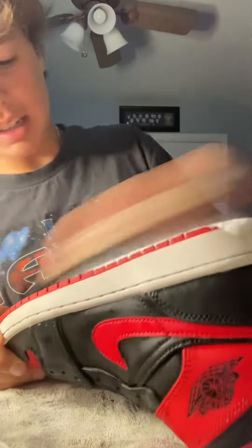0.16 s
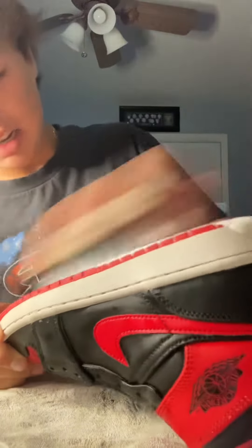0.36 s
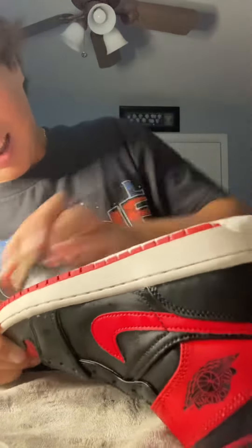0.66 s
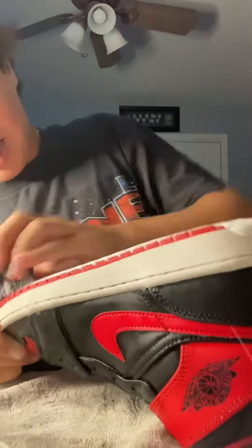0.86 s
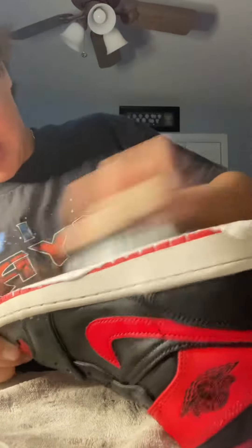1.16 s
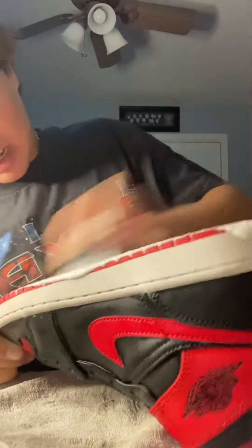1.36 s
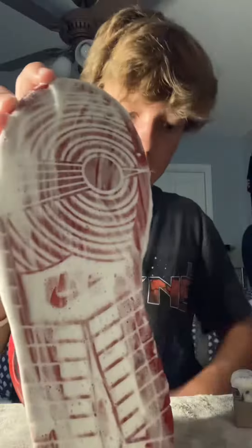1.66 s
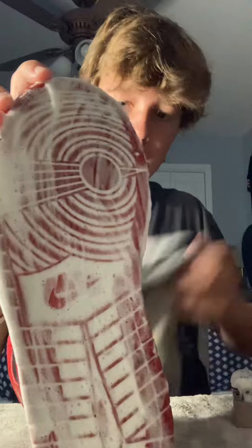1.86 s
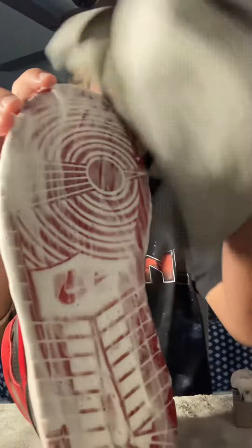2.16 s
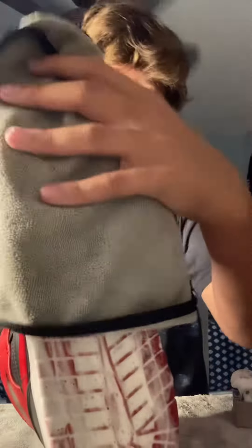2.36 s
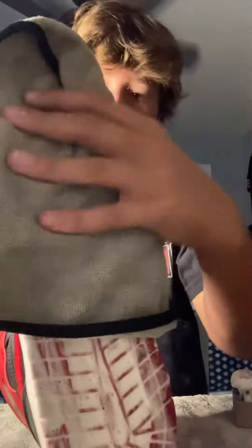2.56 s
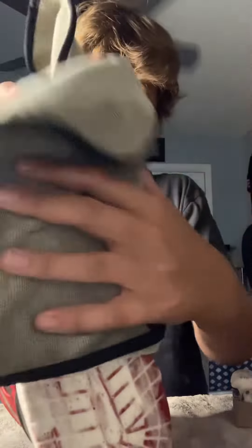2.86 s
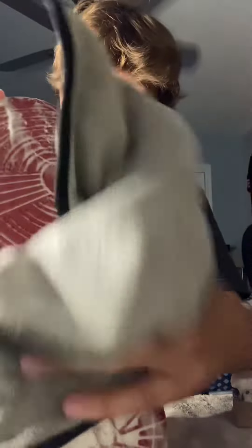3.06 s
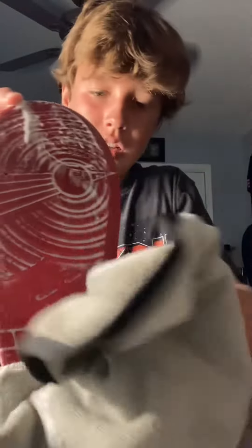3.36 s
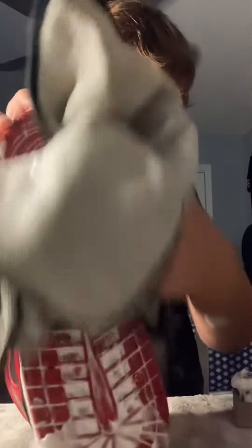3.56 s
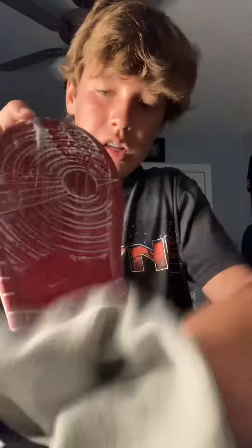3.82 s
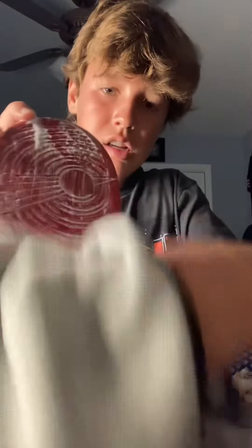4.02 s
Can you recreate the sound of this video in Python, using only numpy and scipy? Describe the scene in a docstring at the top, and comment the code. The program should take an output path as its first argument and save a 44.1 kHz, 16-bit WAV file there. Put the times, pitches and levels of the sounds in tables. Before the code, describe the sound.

Rapid scratchy back-and-forth brushing on a sneaker sole cuts off, leaving a quiet room with faint cloth rustle, soft thuds and muffled wiping.

```python
"""A stiff brush scrubs a sneaker's ridged rubber sole in fast strokes, close to a phone, and breaks off.
Then a cloth is shaken out, patted on the sole and wiped over it in a quiet bedroom.
Brush and cloth: clumped noise of tiny slips, shaped by spectra and resonances, under motion envelopes.
Judder: wavering tones; pats: damped sines with noise taps; room: shaped noise and a narrow whir.
"""
import sys
import numpy as np
from scipy import signal
from scipy.fft import rfft, irfft, next_fast_len
from scipy.io import wavfile
from scipy.ndimage import uniform_filter1d, map_coordinates

SR = 44100
rng = np.random.default_rng(int(sys.argv[2]) if len(sys.argv) > 2 else 0)


def file_out(sig):
    """Save sig as 16-bit WAV at sys.argv[1]."""
    # one column per channel
    cols = np.atleast_2d(sig).T
    # limit, then scale
    lim = np.clip(cols, -1, 1)
    pcm = np.round(lim * 32767).astype(np.int16)
    wavfile.write(sys.argv[1], SR, pcm)


N = 184690  # samples


def amp(db):
    """Decibels to gain."""
    return 10 ** (np.asarray(db) / 20)


def unit(x):
    """Scale to rms 1."""
    return x / np.sqrt(np.mean(x ** 2) + 1e-20)


def along(points, hz):
    """Gain interpolated through (f/Hz, level/dB) points on a log-frequency axis."""
    f, db = np.transpose(points)
    return amp(np.interp(np.log(hz + 1), np.log(f + 1), db, left=-120))


def modes(table, f):
    """Causal response of parallel resonances with alternating sign."""
    total = 0
    for k, (center_hz, width_hz, db) in enumerate(table):
        damping = 1j * f * width_hz
        total = total + (-1) ** k * amp(db) * damping / (center_hz ** 2 - f * f + damping)
    return total


def filtered(x, response):
    """Apply a complex frequency response, zero-padded."""
    m = next_fast_len(N + SR // 2)
    return irfft(rfft(x, m) * response(np.fft.rfftfreq(m, 1 / SR)), m)[..., :N]


def wobble(knots_per_s):
    """Smooth random curve through spline knots."""
    knots = rng.standard_normal(int(N / SR * 400) + 4)
    return map_coordinates(knots, [np.arange(N) * min(knots_per_s, 400) / SR])


def grit(spiky_db, clump_db, knots_per_s):
    """Two rows of dense tiny slips: a few far stronger, the strength clumped in time."""
    sizes = amp(spiky_db * rng.exponential(size=N) + clump_db * wobble(knots_per_s))
    return unit(sizes * rng.standard_normal((2, N)))


def patchy(x, depth_db):
    """Colour shifts: smoothed random gain patches in time and frequency."""
    z = signal.stft(x, nperseg=256)[2]
    field = uniform_filter1d(rng.standard_normal(z.shape[1:]), size=4, axis=0)
    field = uniform_filter1d(field, size=10, axis=1)
    return unit(signal.istft(z * amp(depth_db * unit(field)), nperseg=256)[1][:, :N])


def arch(start_s, length_s, lean):
    """Motion swelling 0-1-0; lean < 1 peaks early, > 1 late."""
    done = np.clip((np.arange(N) / SR - start_s) / length_s, 0, 1)
    return np.abs(np.sin(np.pi * done ** np.clip(lean, .3, 3)))


def walls(x, t60_s, wet_db):
    """Add a furnished room's short answer: exponentially decaying noise."""
    t = np.arange(SR // 4) / SR
    tail = rng.standard_normal((2, len(t))) * amp(-60 * t / t60_s)
    return x + amp(wet_db) * signal.fftconvolve(x, tail / np.linalg.norm(tail[0]), axes=1)[:, :N]


# channel relation above the pair tables, lead growing evenly: (in-phase f/Hz, f per full turn/Hz, likeness 0-1)
TREBLE_LEAD = (8775, 5080, 1)


def ports(rows, table):
    """Two phone channels from a direct and an unrelated row, with frequency-dependent phase lead."""
    f, lead, alike = np.transpose(table)
    zero_hz, turn_hz, treble = TREBLE_LEAD
    # whole number of turns at zero_hz: channels in phase there
    level = 2 * np.pi * np.round(lead[-1] / (2 * np.pi) + (zero_hz - f[-1]) / turn_hz)
    top = level + 2 * np.pi * (SR / 2 - zero_hz) / turn_hz

    def response(hz, row):
        phase = np.interp(hz, [*f, zero_hz, SR / 2], [*lead, level, top])
        likeness = np.clip(np.interp(hz, [*f, zero_hz], [*alike, treble]), 0, 1)
        u = np.arccos(likeness) / 2
        mix = [[np.cos(u), np.cos(u)], [np.sin(u), -np.sin(u)]][row]
        return mix * np.exp(.5j * phase * [[1], [-1]])

    direct = filtered(rows[0], lambda hz: response(hz, 0))
    unrelated = filtered(rows[1], lambda hz: response(hz, 1))
    return direct + unrelated


# brush strokes, each to the next turn: (turn t/s, bristle level/dB, tread level/dB, hollow-shoe level/dB, lean)
BRUSH_STROKES = [(-.05, -29, -29, -36, 0.72), (0.071, -22, -22.5, -32.5, 0.62), (.174, -23.5, -21, -28, 1),
                 (0.281, -24, -24, -29, 1.05), (.4, -22.5, -20.5, -29, 0.98), (0.519, -22, -20, -28, 0.97),
                 (0.611, -22, -24, -32, 1.045), (0.728, -21.5, -24, -35.5, 0.92),
                 (0.833, -22.5, -22, -31.5, 0.87), (0.954, -21.5, -19.5, -30.5, 0.86),
                 (1.063, -25, -20.5, -29, .99), (1.166, -24, -20.5, -29.5, 1.09),
                 (1.269, -30, -25, -30.5, 1.02), (1.393, -28, -27, -30.5, 0.79),
                 (1.499, -30.5, -28.5, -28.5, 0.9)]
OVERLAP_S, LAST_STROKE_S = 0.011, 0.11  # bristles trail past the turn; length of the stroke that breaks off
PUSH_LATER = 1.2  # lean factor: weight peaks later than speed


def stroke_levels():
    """Bristle, tread and push envelopes: louder the faster, or heavier, the stroke."""
    tips, ridges, push = np.zeros((3, N))
    lengths = np.append(np.diff([row[0] for row in BRUSH_STROKES]), LAST_STROKE_S) + OVERLAP_S
    for (start, tips_db, tread_db, hollow_db, lean), length in zip(BRUSH_STROKES, lengths):
        speed = np.tanh(1.215 * arch(start, length, lean) ** 1.8)  # quick turn, even sweep
        tips += amp(tips_db) * speed ** 1.21
        ridges += amp(tread_db) * speed
        push += amp(hollow_db) * arch(start, length, PUSH_LATER * lean) ** 1.1
    return tips, ridges, push


# bristle slip spectrum: (f/Hz, relative level/dB per Hz)
BRISTLE_SPECTRUM = [(500, -36.5), (1200, -28), (3000, -8), (5000, -4.5), (6400, -12.5), (8000, -11.5),
                    (12000, -13.5), (15500, -19)]


def bristles(level):
    """Bristle tips slip over the tread: hiss."""
    hiss = filtered(grit(1.9, 1.6, 85), lambda hz: along(BRISTLE_SPECTRUM, hz))
    return level * patchy(hiss, depth_db=3.0)


# tread resonances: (f/Hz, width/Hz, relative level/dB)
TREAD_MODES = [(833, 170, 5.5), (1462, 160, 9), (1770, 400, 5), (2803, 790, 14.5), (3138, 954, 11.5),
               (5240, 4700, -8)]


def tread(level):
    """Slips ring the rubber ridges; resonances trade strength at random, about as fast as the strokes."""
    slips = grit(2.38, 1.1, 90)
    scratch = 0
    for k, mode in enumerate(TREAD_MODES):
        ring = filtered(slips, lambda hz: modes([mode], hz))
        scratch = scratch + (-1) ** k * amp(1.5 * wobble(9)) * ring
    return level * patchy(scratch, depth_db=2.0)


# hollow shoe body resonances: (f/Hz, width/Hz, relative level/dB)
HOLLOW_MODES = [(212.3, 22, -1), (272, 34, -3), (327.7, 26, -1.5), (430, 29, -10), (500, 23, -12)]


def hollow_response(hz):
    """Shoe body resonances, high-passed at 170 Hz."""
    return modes(HOLLOW_MODES, hz) * hz ** 4 / (hz ** 4 + 170 ** 4)


def hollow_shoe(level):
    """Pushing slips shake the hollow shoe."""
    return level * unit(filtered(grit(2.6, 3.5, 60), hollow_response))


# tufts snag on a tread edge: (t/s, kick level/dB, snap level re kick/dB), both levels before fixed trims
SNAGS = [(0.152, -17.5, -12.5), (0.211, -21.5, -11.5), (0.242, -17.5, -9), (0.337, -24, 1), (0.433, -23, 0),
         (0.469, -24.5, -2), (0.56, -10, -2), (0.596, -4.5, -17), (0.859, -24.5, 7), (0.919, -32.5, 13.5),
         (0.991, -27, 6), (1.091, -22, -6), (1.212, -17, 3), (1.261, -18, -21.5), (1.331, -25.5, 1),
         (1.426, -15.5, -0.5), (1.45, -21, 4.5), (1.548, -35.5, -2.5)]


def catches():
    """Each snag kicks the shoe body with an impulse and briefly lifts the tread scratch."""
    t = np.arange(N) / SR
    kicks, snaps = np.zeros((2, N)), np.zeros(N)
    for s, db, snap_db in SNAGS:
        kicks[0, round(s * SR)] = amp(db + 41.5)
        snaps += amp(db + snap_db - 8.5) * np.exp(-((t - s - .004) / 0.0043) ** 2)
    return filtered(kicks, hollow_response), snaps


# pressed brush judders over evenly spaced ridges: (start t/s, end t/s, first f/Hz, last f/Hz, level/dB, lean)
RIDGE_JUDDERS = [(0.12, 0.169, 270, 288, -26.5, 1.45), (0.193, 0.286, 225, 337, -19.5, 0.85),
                 (0.432, 0.505, 334.2, 308, -25, 0.96), (0.552, .612, 345, 305, -19.5, 1.5)]


def judder():
    """Uneven near-periodic tugs on the tufts: a gliding, wavering tone that swells and dies."""
    t, out = np.arange(N) / SR, np.zeros((2, N))
    for start, end, first_hz, last_hz, db, lean in RIDGE_JUDDERS:
        done = np.clip((t - start) / (end - start), 0, 1)
        pitch_hz = (first_hz + (last_hz - first_hz) * done) * (1 + 0.057 * wobble(70))
        turns = np.cumsum(pitch_hz) / SR
        tugs = np.sin(2 * np.pi * turns) + 0.051 * np.sin(4 * np.pi * turns)
        out[0] += amp(db + 1.1 * wobble(80)) * arch(start, end - start, lean) * tugs
    return out


# low flutter spectrum, brush and cloth: (f/Hz, relative level/dB per Hz)
FLAP_SPECTRUM = [(20, -24.5), (50, 5.5), (100, -5), (150, -5), (220, -51)]
# channel relation, brush: (f/Hz, left lead/rad, likeness 0-1)
BRUSH_PAIR = [(60, 3.5, 0.7), (170, 2.5, 0.97), (340, -0.1, 0.9), (520, -1.5, .95), (1050, -1.68, 0.1),
              (1450, -1, 0.9), (2010, -0.63, 0.2), (2370, -3.5, 0.89), (2741, -3.5, 0.8), (3096, 1.46, 0.6),
              (4250, -3.5, 0.63), (5380, -0.2, 0.01), (5840, -4, 1), (6910, -5.5, 0.8), (7300, -8.5, 0.7)]
BREAK_OFF_S = 1.557


def brush():
    """Bristles, tread, shoe, snags and judder in the room, over a low sway, cut at break-off."""
    t = np.arange(N) / SR
    tips, ridges, push = stroke_levels()
    snags, snaps = catches()
    near = bristles(tips) + tread(ridges + snaps) + hollow_shoe(push) + judder() + snags
    sway = amp(-54.5) * unit(filtered(grit(1.3, 1.2, 6.0), lambda hz: along(FLAP_SPECTRUM, hz)))
    sound = walls(near, t60_s=.1, wet_db=-11) + sway
    return ports(sound, BRUSH_PAIR) * np.clip((BREAK_OFF_S - t) / 0.0079, 0, 1)


# air and microphone noise spectrum: (f/Hz, relative level/dB per Hz)
ROOM_SPECTRUM = [(25, -28), (55, 1.5), (140, -8), (300, -16.5), (700, -28), (1100, -24.5), (1800, -29.5),
                 (3300, -36.5), (9000, -45), (15500, -47)]
# faint narrow whir near 600 Hz: (start t/s, length/s, level/dB, lean)
WHIR_SWELLS = [(1.558, 0.39, -71.5, .45), (2.152, 0.71, -66, 1.32)]
# channel relation, room and cloth: (f/Hz, left lead/rad, likeness 0-1)
CLOTH_PAIR = [(59.8, -1.5, 1), (292, 0.5, 0.47), (805, -1.13, 0.54), (1530, -5.5, 0.55), (2550, 5.5, 0.53),
              (4070, 3, .55), (5560, 8.5, .6), (6760, 20, 0.27)]


def room():
    """Faint, slightly unsteady air and microphone noise; narrow-band noise swells as the whir."""
    noise = filtered(rng.standard_normal((2, N)), lambda hz: along(ROOM_SPECTRUM, hz))
    air = amp(-66.5 + 1.5 * wobble(6)) * patchy(noise, depth_db=1.0)
    swell = sum(amp(db) * arch(start, length, lean) ** 1.5 for start, length, db, lean in WHIR_SWELLS)
    narrow = unit(filtered(rng.standard_normal((2, N)), lambda hz: modes([(585, 103, 0)], hz) ** 2))
    return ports(air + swell * narrow, CLOTH_PAIR)


# cloth moving over the sole: (start t/s, length/s, nap level/dB, fuzz level/dB, rub level/dB,
# sole level/dB, flap level/dB, lean of the pressure)
CLOTH_WIPES = [(2.151, 0.27, -67.5, -85, -72, -60, -55.5, .45),
               (2.312, 0.4, -66.5, -85, -66.5, -66, -65, 1.2),
               (2.62, .22, -55, -61, -62, -60.5, -69.5, 1.1),
               (2.876, 0.21, -52.5, -63, -59, -54.5, -63, 1.05),
               (3.034, 0.19, -52.5, -65, -55, -52.5, -58, 0.92),
               (3.196, 0.15, -59, -76, -58, -65.5, -64, 1.05), (3.3, .17, -79, -94, -69, -68, -63, .8),
               (3.412, 0.25, -55, -74, -49.5, -47.5, -53.5, .8),
               (3.637, 0.23, -51, -68, -49.5, -43, -44, 1.6),
               (3.918, 0.32, -56.5, -81, -52.5, -48.5, -48, 1.2)]
FLAT, FUZZ_POWER, PRESS_POWER = 1.4, 2.5, 1.9  # sweep evenness; fuzz exponent on speed; weight exponent on arch
FLAP_TRAILS = 1.25  # flap length / wipe length


def wipe_levels():
    """Envelopes per wipe: nap and fuzz follow speed, rub and sole weight, flap a longer arch."""
    napping, fuzzing, rubbing, pressing, flapping = np.zeros((5, N))
    for start, length, nap_db, fuzz_db, rub_db, sole_db, flap_db, lean in CLOTH_WIPES:
        speed = np.tanh(FLAT * arch(start, length, np.sqrt(lean)) ** 1.6)
        weight = arch(start, length, lean) ** PRESS_POWER
        napping += amp(nap_db) * speed
        fuzzing += amp(fuzz_db) * speed ** FUZZ_POWER
        rubbing += amp(rub_db) * (weight + 0.2 * speed)
        pressing += amp(sole_db) * weight
        flapping += amp(flap_db) * arch(start, FLAP_TRAILS * length, lean) ** 1.5
    return napping, fuzzing, rubbing, pressing, flapping


# short rustles of fingers and folds: (t/s, half-length/s, nap level/dB, rub level/dB)
FOLD_RUSTLES = [(1.571, .015, -68, -69), (1.628, .006, -85, -74), (1.774, 0.017, -86, -73),
                (1.825, 0.014, -86.5, -71), (1.966, 0.00604, -81.5, -87), (2.065, .05, -82, -86),
                (2.228, .012, -78, -72), (2.313, 0.0096, -71, -82.5), (2.362, 0.011, -66, -75.5)]


def rustle_levels():
    """Gaussian bursts for nap and rub."""
    t = np.arange(N) / SR
    nap, rub = np.zeros((2, N))
    for s, half_s, nap_db, rub_db in FOLD_RUSTLES:
        burst = np.exp(-((t - s) / half_s) ** 2)
        nap += amp(nap_db) * burst
        rub += amp(rub_db) * burst
    return nap, rub


# nap and fuzz spectra: (f/Hz, relative level/dB per Hz)
NAP_SPECTRUM = [(1500, -20.5), (2300, -2.5), (3200, 4), (4300, 3.5), (5500, -6.5), (7000, -4.5),
                (10500, -11.5), (12500, -25)]
FUZZ_SPECTRUM = [(9000, -16), (12000, -9), (14000, -3.5), (15600, -19)]
# cloth draped loosely on the tread, cloth pressed on it, sole: (f/Hz, width/Hz, relative level/dB)
DRAPE_MODES = [(1590, 430, 3), (1904, 840, -6.5)]
RUB_MODES = [(500, 130, -4), (905, 320, -0.5), (1360, 170, 1), (1650, 240, 0), (1990, 430, -6.5)]
SOLE_MODES = [(140, 70, -8), (210, 34, 2), (325, 92, 4), (486, 240, -11)]
PRESS_S = 2.86  # hand presses the cloth down from here


def cloth():
    """Nap hisses and rubs on the tread, sole rumbles under the hand, loose cloth flaps air at the phone."""
    t = np.arange(N) / SR
    napping, fuzzing, rubbing, pressing, flapping = wipe_levels()
    nap_rustle, rub_rustle = rustle_levels()
    fibres = grit(1.2, 0.7, 70)
    nap_hiss = patchy(filtered(fibres, lambda hz: along(NAP_SPECTRUM, hz)), depth_db=2.0)
    nap = (napping + nap_rustle) * nap_hiss
    fuzz_hiss = unit(filtered(fibres, lambda hz: along(FUZZ_SPECTRUM, hz)))
    fuzz = (fuzzing + amp(-5) * nap_rustle) * fuzz_hiss
    loose = patchy(filtered(fibres, lambda hz: modes(DRAPE_MODES, hz)), depth_db=4.0)
    pressed = patchy(filtered(fibres, lambda hz: modes(RUB_MODES, hz)), depth_db=4.0)
    rub = (rubbing + rub_rustle) * np.where(t < PRESS_S, loose, pressed)
    sole = pressing * unit(filtered(grit(2.8, 3.4, 50), lambda hz: modes(SOLE_MODES, hz)))
    flap = flapping * unit(filtered(grit(1.5, 3, 22), lambda hz: along(FLAP_SPECTRUM, hz)))
    near = walls(nap + fuzz + rub + sole, t60_s=0.14, wet_db=-8.5)
    return ports(near + flap + pats(), CLOTH_PAIR)


# hand shifts on the shoe and bumps it through the cloth:
# (t/s, thud level before attack/dB, nominal f/Hz, thud t60/s, tap level re thud before filter/dB)
HAND_PATS = [(2.1648, -54, 200, .05, 15), (3.311, -35, 310, .08, -6), (3.6596, -60, 300, .04, 15),
             (2.173, -48, 130, .08, -12), (2.225, -49, 110, .08, -20), (2.358, -43, 75, .1, -19),
             (3.338, -45, 135, .15, -30), (3.785, -29, 260, .05, -25), (3.862, -41, 90, .08, -30),
             (4.13, -38, 320, .04, -30)]
# tap spectrum: (f/Hz, gain/dB)
TAP_SPECTRUM = [(300, -22), (900, -2), (1600, 0), (3000, 0), (6000, -7), (10000, -20), (16000, -35)]
SAG = 0.15  # share of nominal pitch lost over t60


def pats():
    """Quickly damped sine thud, pitch sinking, with a noise tap at first contact."""
    thuds, taps, t = np.zeros(N + SR), np.zeros(N + SR), np.arange(SR // 4) / SR
    for s, db, hz, t60_s, tap_db in HAND_PATS:
        at = round(s * SR)
        sinking = (1 + SAG / 4) * (1 - SAG / 2 * np.minimum(t / t60_s, 1))
        attack = 1 - np.exp(-t / .003)
        thuds[at:][:len(t)] += amp(db - 60 * t / t60_s) * np.sin(2 * np.pi * hz * t * sinking) * attack
        taps[at:][:len(t)] += amp(db + tap_db - 60 * t / .018) * rng.standard_normal(len(t))
    contact = filtered(taps[:N], lambda hz: along(TAP_SPECTRUM, hz))
    return np.array([thuds[:N] + contact, np.zeros(N)])


def scene():
    """Brushing, then wiping, in the quiet room."""
    return brush() + cloth() + room()


# channel balance: (f/Hz, left over right level/dB)
LEFT_OVER_RIGHT = [(10, -1), (3000, 0.5), (5000, 2.5), (7000, 1.5), (9000, -0.5), (16000, -0.5)]
TOP_HZ = 15950  # phone band limit


def record(dry):
    """Phone: frequency-dependent channel balance, deepest bass and all above the band limit dropped."""
    def response(hz):
        high_pass = hz ** 4 / (hz ** 4 + 32 ** 4)
        low_pass = np.clip((TOP_HZ - hz) / 250, 0, 1) ** 2
        balance = along(LEFT_OVER_RIGHT, hz) ** np.array([[.5], [-.5]])
        return balance * high_pass * low_pass
    return filtered(dry, response)


dry = scene()
out = record(dry)
file_out(out)
```